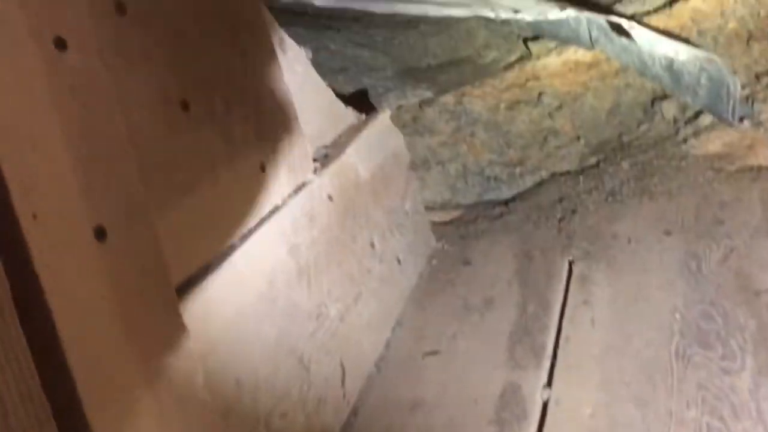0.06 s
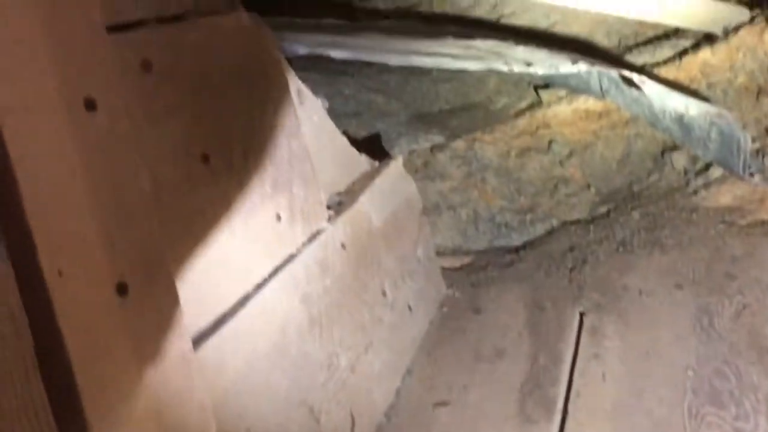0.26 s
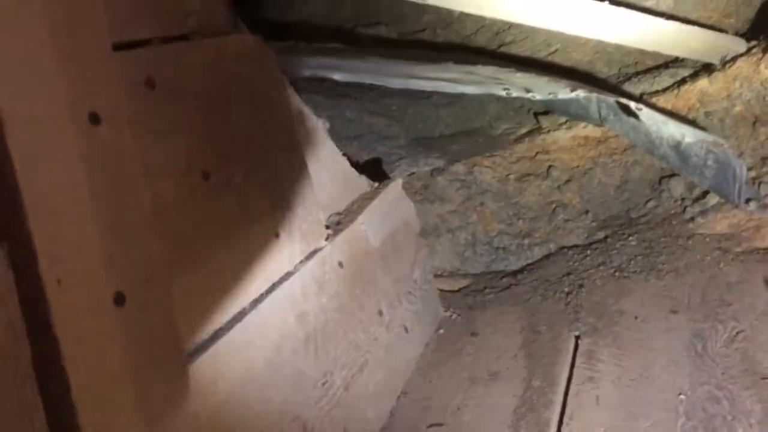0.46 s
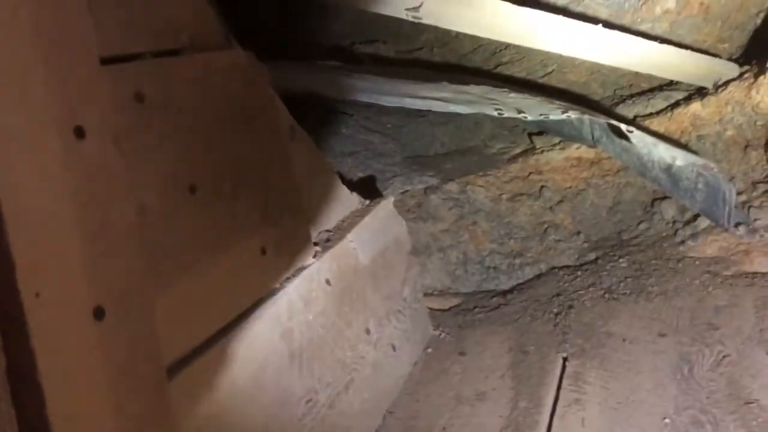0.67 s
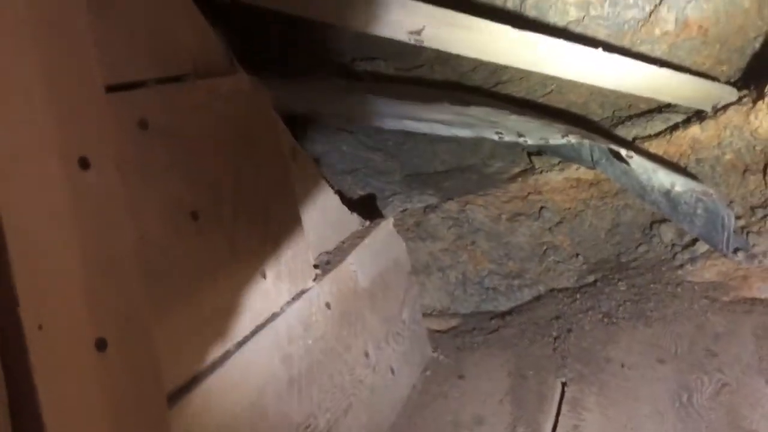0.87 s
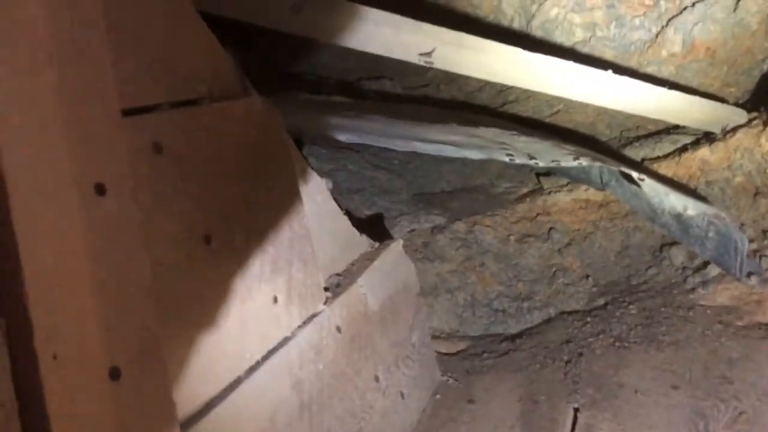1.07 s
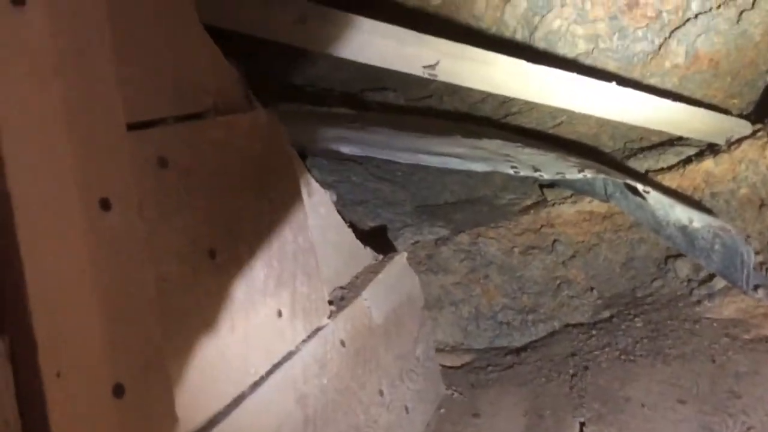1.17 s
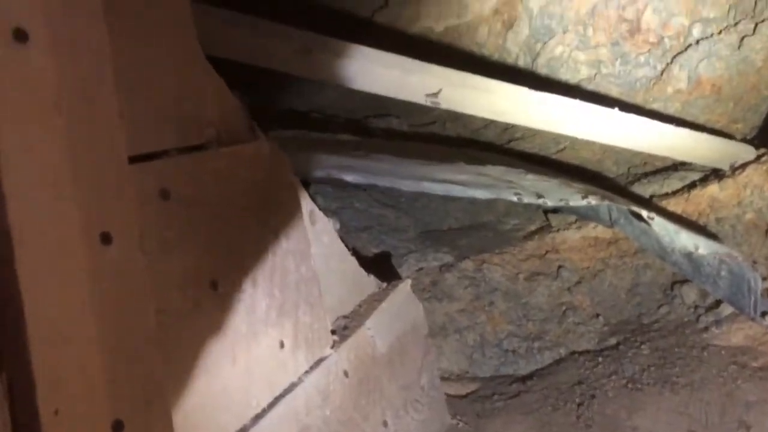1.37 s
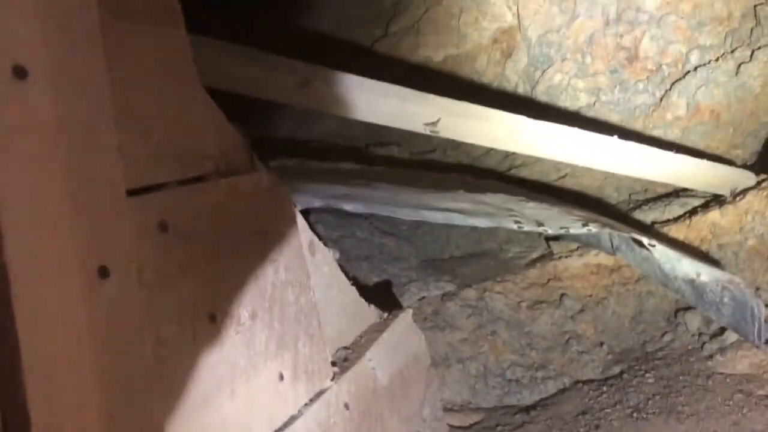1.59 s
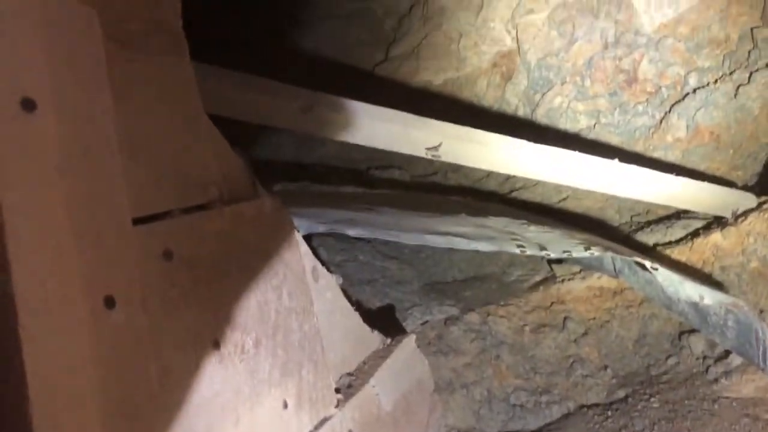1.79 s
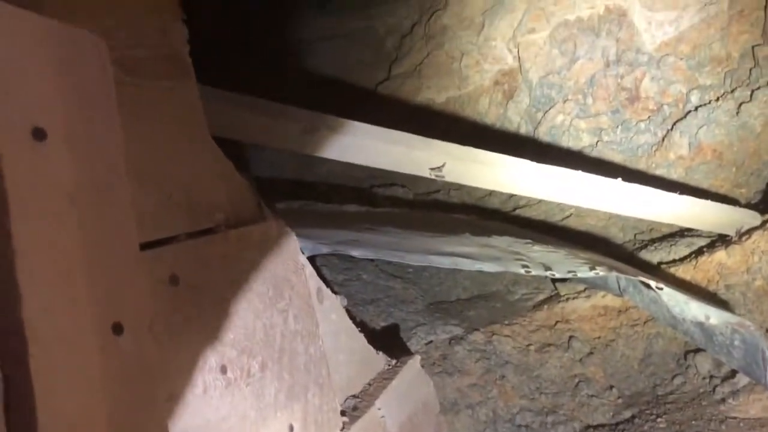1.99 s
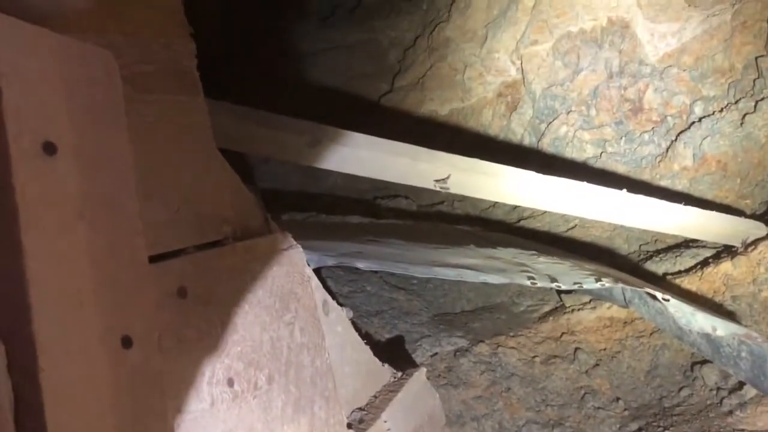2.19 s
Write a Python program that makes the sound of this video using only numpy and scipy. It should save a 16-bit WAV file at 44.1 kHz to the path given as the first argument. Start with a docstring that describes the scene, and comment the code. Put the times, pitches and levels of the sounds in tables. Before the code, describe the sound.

A small load of stones lands on a wooden chute nearby, making the boards boom softly. Stray pebbles follow in uneven clicks and knocks while fine grit trickles faintly, and the rock walls of the mine echo dully.

```python
"""A shovelful of loose rock crashes down a wooden chute in a mine.
Single pebbles then tick and knock their way after it. Each contact is a short gritty burst
that the rock walls throw back, quickly at first and then as a long dull tail.
Larger stones ring, the boards rumble and boom, fine grit trickles, and the tunnel hisses faintly."""
import sys
import numpy as np
from scipy import signal
from scipy.io import wavfile

SR = 44100
rng = np.random.default_rng(int(sys.argv[2]) if len(sys.argv) > 2 else 0)


def to_wav(s):
    """Save 16-bit WAV."""
    ch = np.atleast_2d(s).T  # columns
    pcm = np.round(np.clip(ch, -1, 1) * 32767)  # PCM
    wavfile.write(sys.argv[1], SR, pcm.astype(np.int16))


N = 99136
TIME = np.arange(N) / SR
BAND_EDGES_HZ = 20 * 2 ** np.arange(0, 10, 1 / 3)


def from_db(db):
    return 10 ** (np.asarray(db) / 20)


def power_from_db(db):
    return from_db(2 * db)


def unit_level(x):
    return x / np.sqrt(np.mean(x ** 2) + 1e-20)


def over_time(rows):
    return np.interp(TIME, *np.transpose(rows))


def at_pitch(rows, hz):
    pitches, values = np.transpose(rows)
    return np.interp(np.log(hz), np.log(pitches), values)


def gritty_noise(power_at):
    """Rough noise in bands a third of an octave wide; power_at(hz) says how strong each band is."""
    noise = rng.standard_normal((2, N))
    noise *= from_db(1.5 * rng.standard_normal(N // 16 + 1).repeat(16)[:N])   # the level flickers
    out = np.zeros(N)
    for k, (low, high) in enumerate(zip(BAND_EDGES_HZ, BAND_EDGES_HZ[1:])):
        hz = np.sqrt(low * high)
        band = signal.butter(3 if hz > 2500 else 2, [low, high], "band", fs=SR, output="sos")
        out += signal.sosfilt(band, noise[k % 2] * np.sqrt(power_at(hz)))
    return out * 2


# Tone of the tunnel's air: f/Hz, relative level/dB
AIR_TONE = [(20, -22.5), (55, 1.5), (400, -15.5), (4500, -30), (16000, -36)]
def tunnel_air():
    """A faint, steady hiss, strongest in the bass."""
    hiss = gritty_noise(lambda hz: power_from_db(at_pitch(AIR_TONE, hz)))
    return from_db(-71.5) * unit_level(hiss)


# How strongly the grit slides: t/s, level/dB
GRIT_FLOW = [(0, -90), (.06, -69.5), (.7, -74.5), (1.4, -60), (1.75, -67), (1.95, -63.5), (2.25, -77)]
# Tone of the grit: f/Hz, relative level/dB
GRIT_TONE = [(300, -3), (1500, -8), (6000, -17.5), (16000, -39.5)]
def trickling_grit(grains_per_s=70):
    """Fine grit slides, with random grains ticking on top. Returns a function: the power at a pitch."""
    lands = rng.random(N) < grains_per_s / SR
    grains = lands * power_from_db(rng.normal(4, 4, N))
    flow = power_from_db(over_time(GRIT_FLOW)) * (1 + die_away(grains, fade_s=.025))
    return lambda hz: flow * power_from_db(at_pitch(GRIT_TONE, hz))


# Low notes of the chute: f/Hz, width/Hz, relative level/dB
BOARD_NOTES = [(91.5, 12, -2.5), (147.9, 11, -2.5), (182.3, 31, -1.5), (274.3, 13, -4)]
# How loudly the chute rumbles: t/s, level/dB
RUMBLE_LEVEL = [(0, -68), (.08, -93), (.14, -58), (.5, -61), (.75, -66), (1.46, -63.5), (1.75, -72.5),
                (1.8, -64), (2, -59), (2.25, -85)]
def rumbling_boards():
    """The load shakes the boards at random, and they answer with their own low notes."""
    out = np.zeros(N)
    for hz, width_hz, db in BOARD_NOTES:
        damping = np.exp(-np.pi * width_hz / SR)
        feedback = [1, -2 * damping * np.cos(2 * np.pi * hz / SR), damping ** 2]
        shake = rng.standard_normal(N + SR)   # an extra second lets the note build up
        for _ in range(2):
            shake = signal.lfilter([1, 0, -1], feedback, shake)
        out += from_db(db) * unit_level(shake[SR:])
    return unit_level(out) * from_db(over_time(RUMBLE_LEVEL))


# Heavy knocks on the wood: t/s, f/Hz, level/dB, fade time/s (a fade time is the time to drop 60 dB)
BOARD_KNOCKS = [(.15, 519.4, -42.5, 0.73), (0.598, 196.8, -53.5, 0.58), (0.13, 138.4, -49, 0.97),
                (0.291, 272.7, -40.5, 0.2), (0.341, 216, -48, 0.69), (0.933, 351.6, -53, 0.38),
                (1.778, 120.4, -52, 1), (1.928, 140, -49, 0.21)]
def booming_boards(rise_s=.01):
    """Heavier stones set single boards booming: each note swells softly and fades."""
    out = np.zeros(N)
    for start, hz, db, fade_s in BOARD_KNOCKS:
        age = np.maximum(TIME - start, 0)
        loudness = (1 - np.exp(-age / rise_s)) * from_db(db - 60 * age / fade_s)
        out += loudness * np.sin(2 * np.pi * (hz * age + rng.random()))
    return out


# Larger stones striking: t/s, fade time/s, list of notes (f/Hz, level/dB)
STONE_NOTES = [(0.0868, 0.41, [(1535, -36.5), (4670, -35)]), (0.2853, 0.13, [(2650, -42), (4080, -44),
               (6650, -43.5), (8200, -45.5)]), (0.49, 0.043, [(1675, -32), (2010, -28.5), (2900, -37),
               (6100, -48)]), (.762, 0.061, [(1200, -46), (1800, -44.5)]), (1.454, 0.09, [(1080, -51.5),
               (1440, -53)]), (1.613, 0.057, [(535, -48), (1080, -53), (1810, -56)]),
               (1.7759, .07, [(1170, -40.5), (1940, -48), (3300, -41.5)])]
def ringing_stones(rise_s=.0008, width_share=.03):
    """A struck stone rings briefly; each note wavers at random, which makes it rough."""
    out, age = np.zeros(N + SR), np.arange(SR // 2) / SR
    for start, fade_s, notes in STONE_NOTES:
        for hz, db in notes:
            waver = np.sqrt(2 * np.pi * width_share * hz / SR) * rng.standard_normal(len(age)).cumsum()
            loudness = (1 - np.exp(-age / rise_s)) * from_db(db - 60 * age / fade_s)
            note = np.sin(2 * np.pi * (hz * age + rng.random()) + waver)
            out[int(start * SR):][:len(age)] += loudness * note
    return out[:N]


def die_away(power, fade_s):
    """Every kick of power starts at its own height and drops 60 dB in fade_s."""
    kept_per_sample = power_from_db(-60 / (fade_s * SR))
    return signal.lfilter([1], [1, -kept_per_sample], power + 1e-18)


# How long the tunnel echoes: f/Hz, fade time/s
TUNNEL_FADE = [(500, 1.28), (1800, 0.57), (4800, 0.23), (12800, 0.14)]
def tunnel_echo(near, hz, db, near_fade_s, length_share=1):
    """Part of the nearby sound's power fills the tunnel, where low pitches linger longest."""
    lingering = die_away(near, length_share * at_pitch(TUNNEL_FADE, hz))
    burst_samples = near_fade_s * SR / np.log(1e6)   # how much a fading burst of height 1 adds up to
    return power_from_db(db) * lingering / burst_samples


# The four pitches that set a pebble's tone: f/Hz
PEBBLE_PITCHES = (560, 1700, 4200, 9800)
# Pebble hits: t/s, level/dB at each of those four pitches, fade time/s at 2000 Hz. The row at 0.187 s is a
# second puff of the crash's treble; the row at 0.001 s is a sound already under way as the scene opens.
PEBBLE_HITS = [(0.001, -69, -59, -59, -74.5, 0.15), (0.0632, -66, -69, -65.5, -64.5, 0.29),
               (0.187, -63, -34, -74.5, -60, 0.062), (0.263, -62, -89, -62, -57.5, 0.17),
               (0.2832, -41.5, -37.5, -44.5, -56, 0.32), (0.4918, -33, -33.5, -43, -70, 0.061),
               (0.5236, -55.5, -51.5, -60, -71, 0.08), (0.5706, -84, -62, -63.5, -78, 0.096),
               (0.722, -79.5, -88, -55, -58.5, 0.047), (0.729, -57.5, -61.5, -68.5, -72, 0.089),
               (0.7602, -41.5, -45, -54, -70.5, 0.082), (0.8766, -60, -60.5, -62, -82, 0.06),
               (0.9304, -36, -44.5, -54, -55, 0.08), (1.035, -57, -61, -63.5, -87, 0.061),
               (1.111, -51, -85, -58, -59, 0.086), (1.1492, -55, -66, -59.5, -73.5, 0.054),
               (1.2093, -43.5, -48, -60.5, -73.5, 0.068), (1.2343, -50, -49, -61.5, -86, 0.05),
               (1.282, -47.5, -56, -73, -90, 0.074), (1.3569, -45, -53, -69, -96.5, 0.12),
               (1.3877, -49, -61, -57, -69.5, 0.083), (1.454, -40, -42.5, -53.5, -68, 0.067),
               (1.5728, -45, -50, -50.5, -75.5, 0.078), (1.583, -73.5, -54.5, -60.5, -66.5, 0.052),
               (1.6115, -50.5, -49, -60.5, -73, 0.079), (1.6645, -71, -59, -50.5, -55.5, 0.078),
               (1.742, -90, -85, -78, -69, 0.054), (1.7743, -40, -44, -35.5, -52, 0.094),
               (1.9641, -50, -61.5, -68, -71.5, 0.14), (2.039, -57, -69, -66, -87, 0.073),
               (2.0895, -78, -73, -61, -64.5, 0.081), (2.177, -72.5, -83, -68.5, -59.5, 0.11),
               (2.2013, -56.5, -62.5, -58.5, -61, 0.077)]
def ticking_pebbles(hz, crack_s=.0013, rise_share=.015):
    """Power of the pebbles at one pitch: each hit is a tiny crack, a quick burst and an echo."""
    near, age = np.zeros(N + SR), np.arange(SR // 4) / SR
    for start, *levels, fade_s in PEBBLE_HITS:
        db = np.interp(np.log(hz), np.log(PEBBLE_PITCHES), levels)
        above_top = max(np.log(hz / PEBBLE_PITCHES[3]), 0)
        db += min(levels[3] - levels[2], 0) * above_top   # dull hits keep falling in the high treble
        progress = age / fade_s * (hz / 2000) ** .21   # high pitches fade sooner
        burst = (1 - np.exp(-progress / rise_share)) * power_from_db(-60 * progress)
        crack = power_from_db(3.5) * (age < crack_s) * min(1, .058 / fade_s) ** 2   # less in long hits
        near[int(start * SR):][:len(age)] += power_from_db(db) * (burst + crack)
    near = near[:N]
    return near + tunnel_echo(near, hz, db=-18.5, near_fade_s=.05, length_share=.55)


# Tone of the landing load: f/Hz, relative level/dB
CRASH_TONE = [(200, -16), (1000, -9.5), (2000, -6.5), (3900, -14.5), (4900, -6.5), (7600, 0.5),
              (11000, -7.5), (16000, -4.5)]
# How long the nearby walls echo: f/Hz, fade time/s
WALL_FADE = [(300, 0.047), (2000, .25), (6000, 0.038), (16000, 0.11)]
def crashing_load(hz, start_s=.0867, spread_s=.03, first_rock_s=.003, clump_s=.004):
    """Power of the crash at one pitch: one rock leads, the rest lands in uneven clumps, the walls echo."""
    age, wall_fade_s = TIME - start_s, at_pitch(WALL_FADE, hz)
    first_rock_db = 8 * (age < first_rock_s) * (hz > 6500)
    thinning_db = 1.5 * np.clip(age / spread_s, 0, 1)
    fading_db = 60 * np.maximum(age - spread_s, 0) / wall_fade_s
    clumps_db = 3.5 * rng.standard_normal(N).repeat(int(clump_s * SR))[:N] * (age > first_rock_s)
    db = -25 + at_pitch(CRASH_TONE, hz) + first_rock_db - thinning_db - fading_db - clumps_db
    near = (age >= 0) * power_from_db(db)
    return near + tunnel_echo(near, hz, db=-4, near_fade_s=wall_fade_s)


def scene():
    """Crash, pebbles and grit shape one noise above 200 Hz; stone notes, boards and air join it."""
    grit = trickling_grit()
    air = tunnel_air()
    rocks = gritty_noise(lambda hz: (hz > 200) * (crashing_load(hz) + ticking_pebbles(hz) + grit(hz)))
    return (rocks + ringing_stones() + rumbling_boards() + booming_boards() + air)[None]


def record(dry, cutoff_hz=15750):
    """The very highest treble is cut away."""
    return signal.sosfilt(signal.ellip(10, .5, 75, cutoff_hz, fs=SR, output="sos"), dry)


dry = scene()
out = record(dry)
to_wav(out)
```